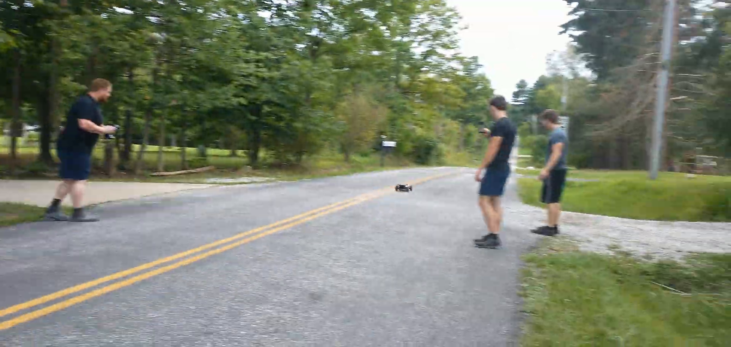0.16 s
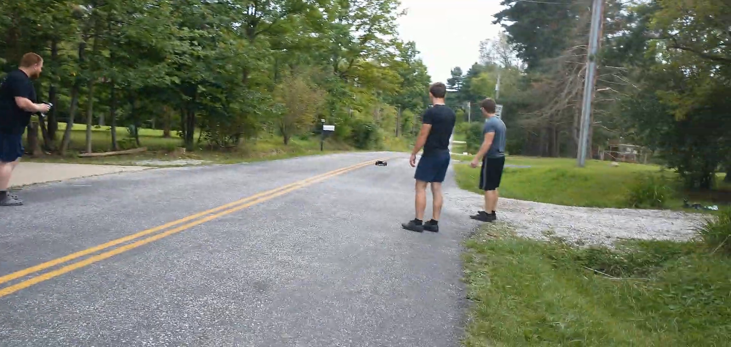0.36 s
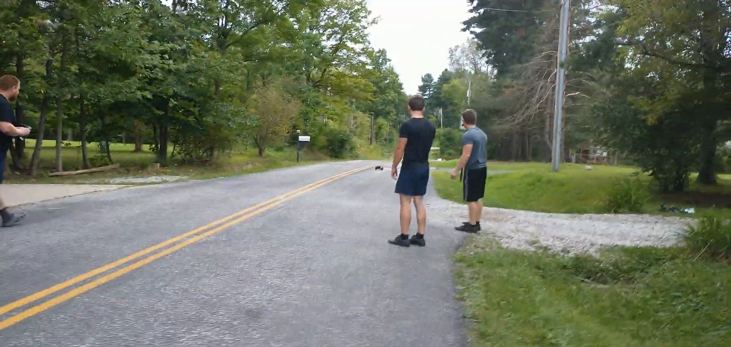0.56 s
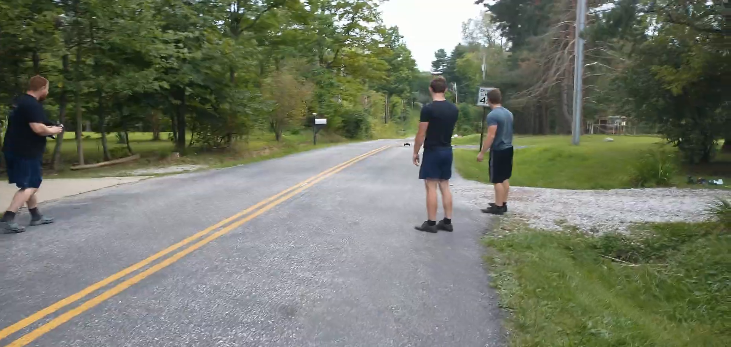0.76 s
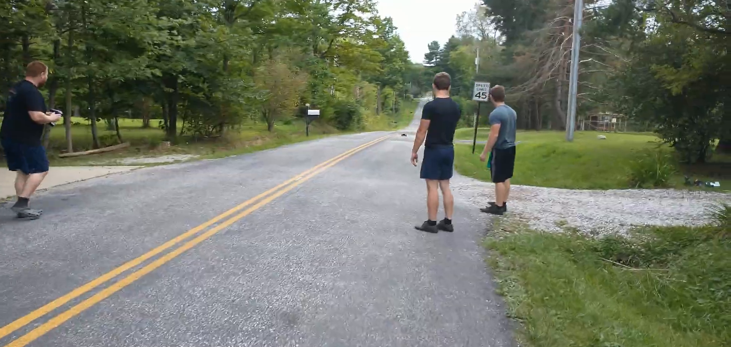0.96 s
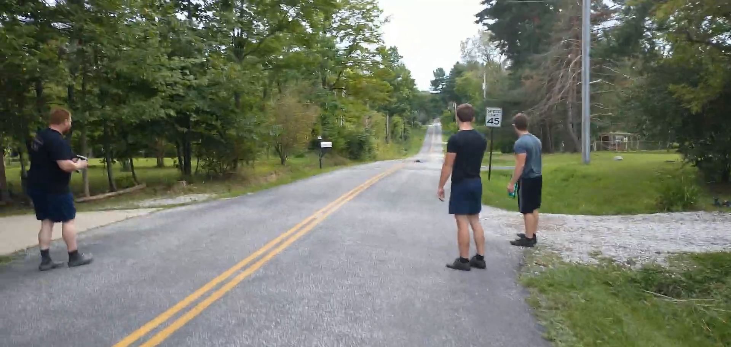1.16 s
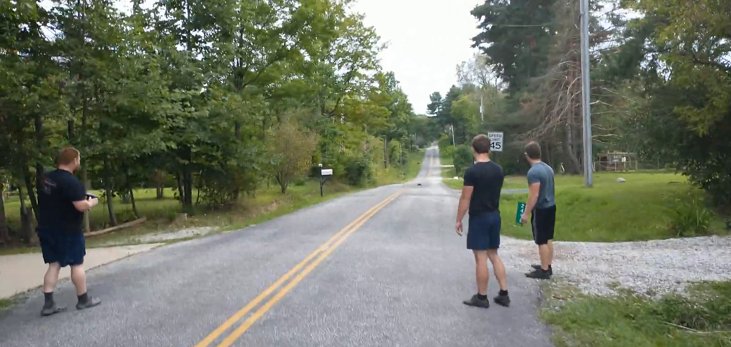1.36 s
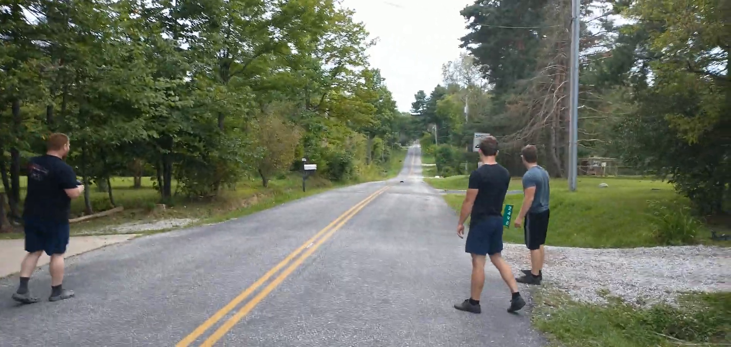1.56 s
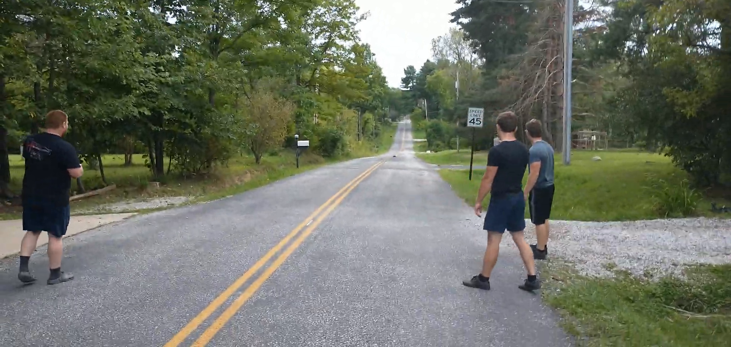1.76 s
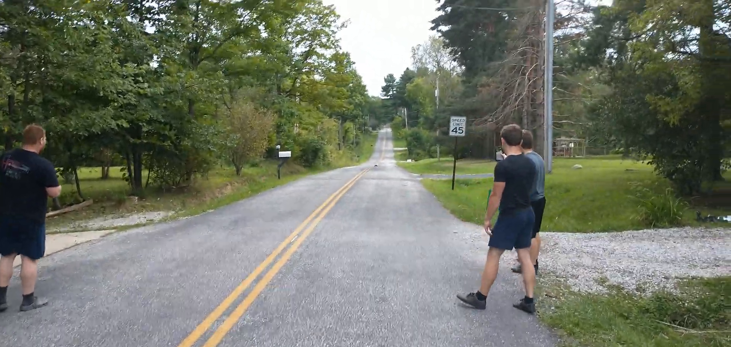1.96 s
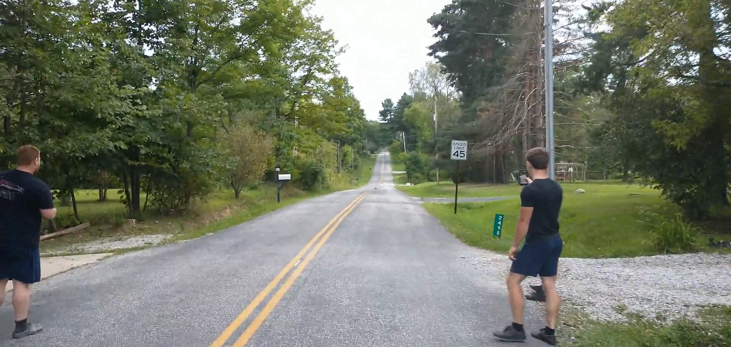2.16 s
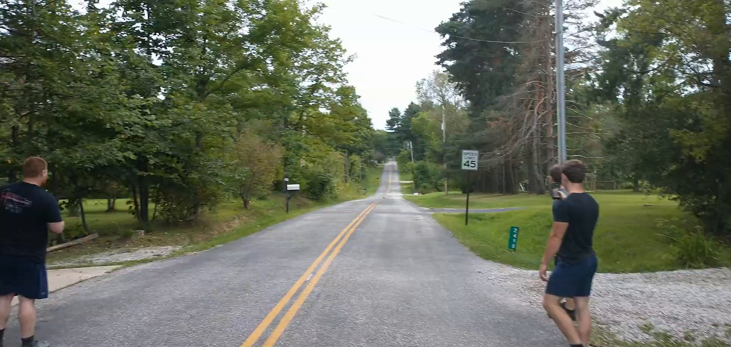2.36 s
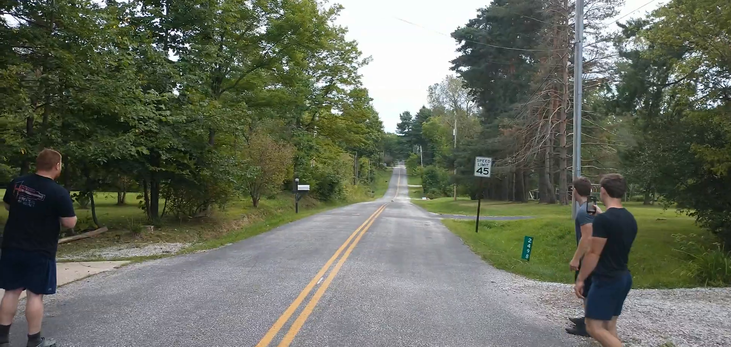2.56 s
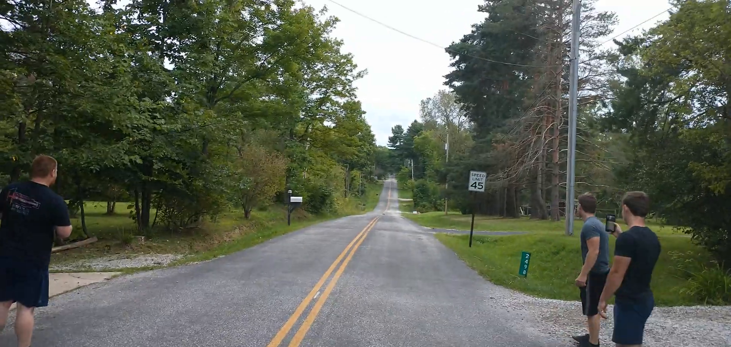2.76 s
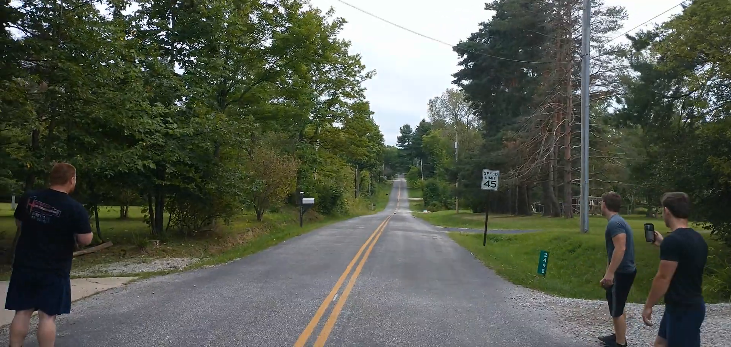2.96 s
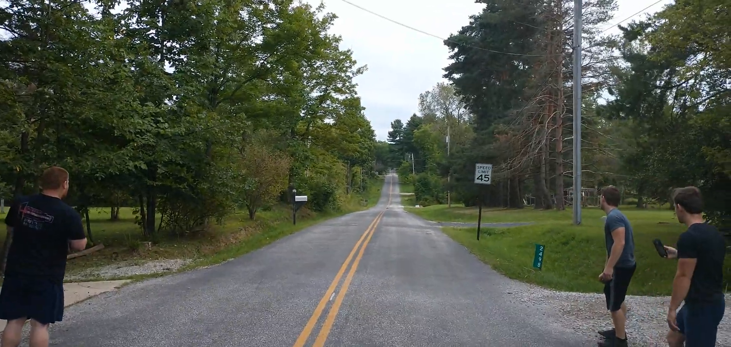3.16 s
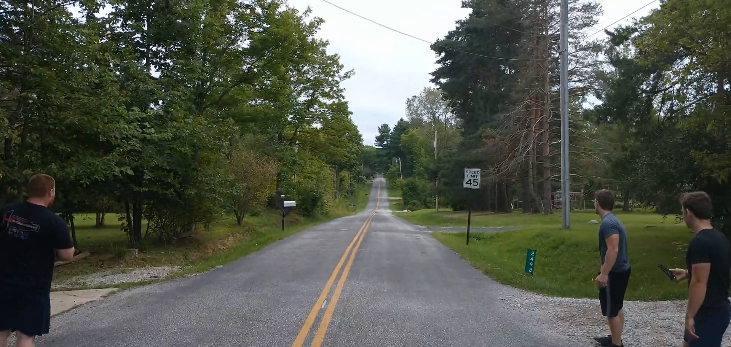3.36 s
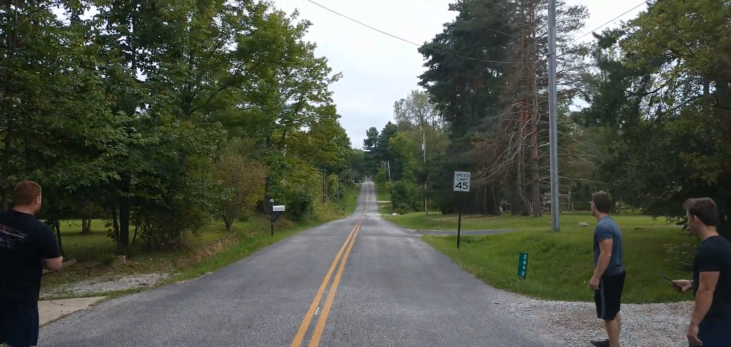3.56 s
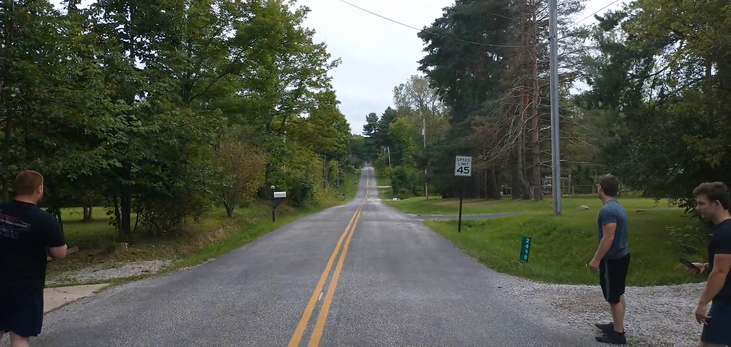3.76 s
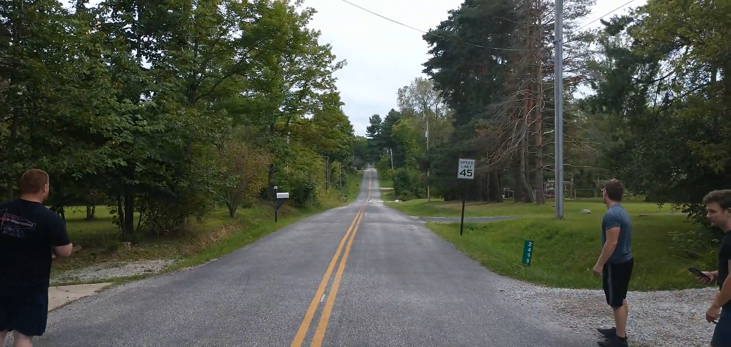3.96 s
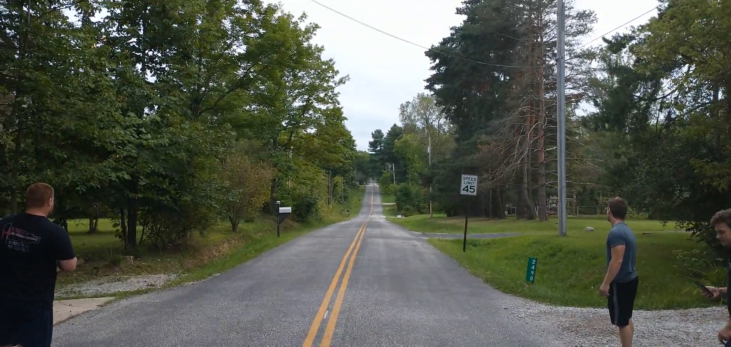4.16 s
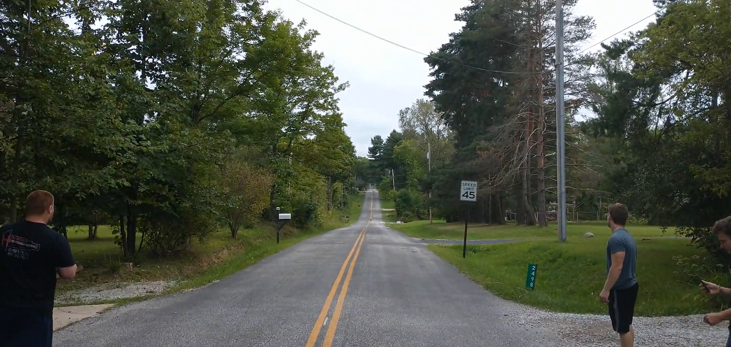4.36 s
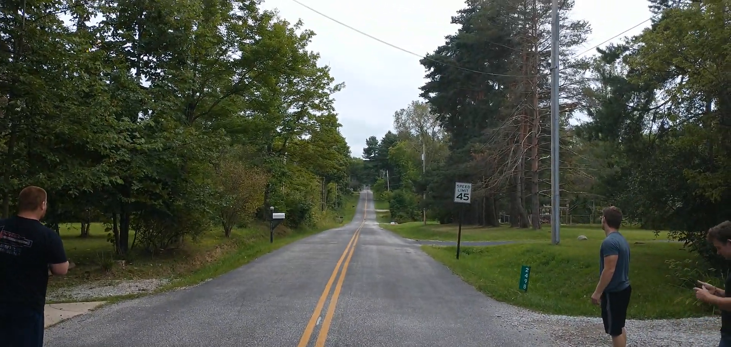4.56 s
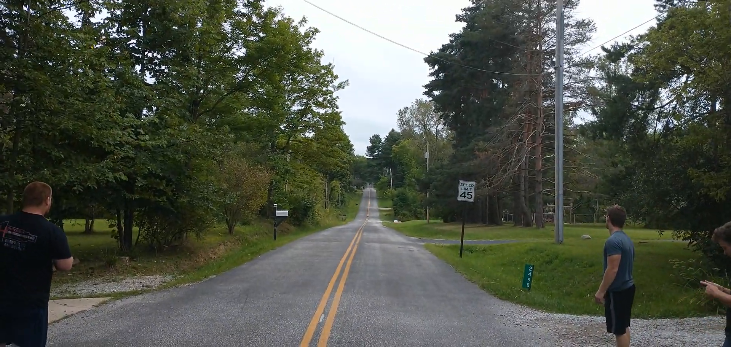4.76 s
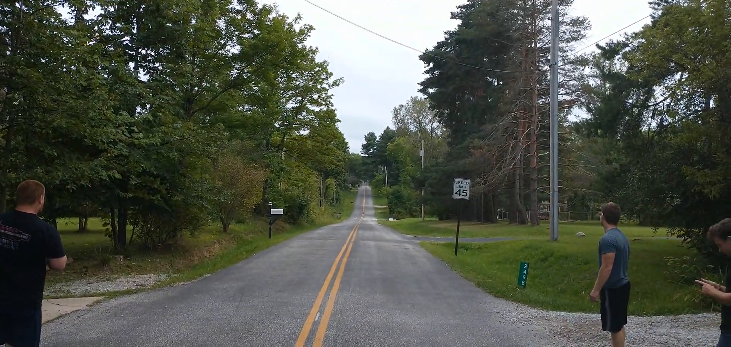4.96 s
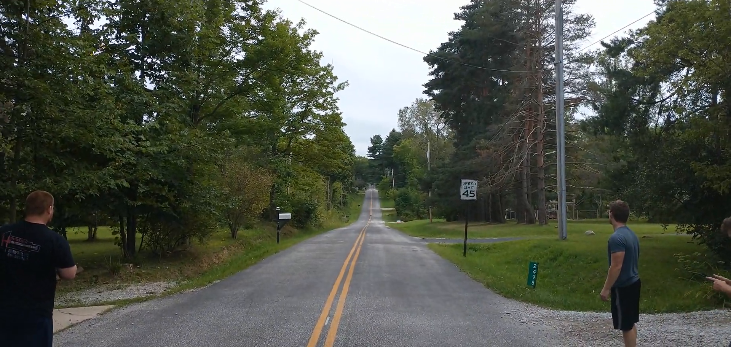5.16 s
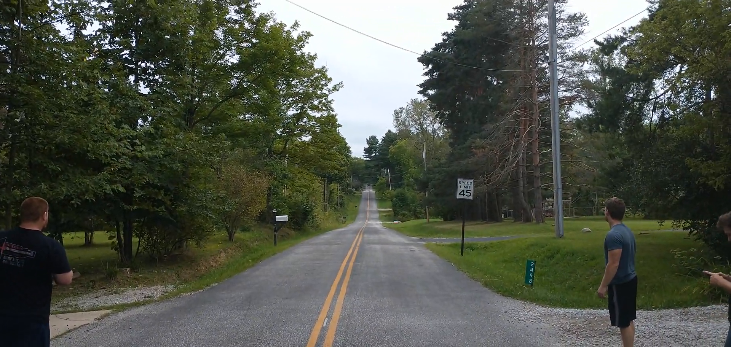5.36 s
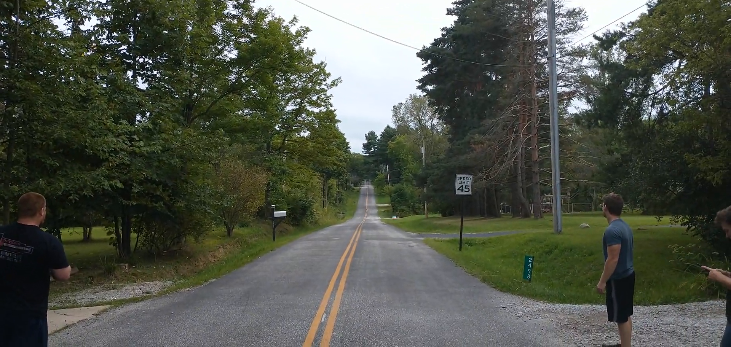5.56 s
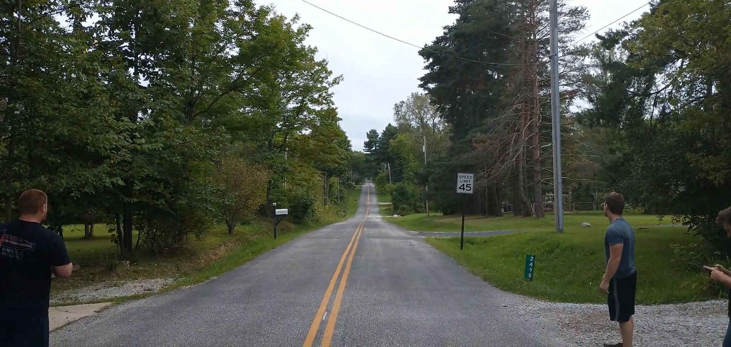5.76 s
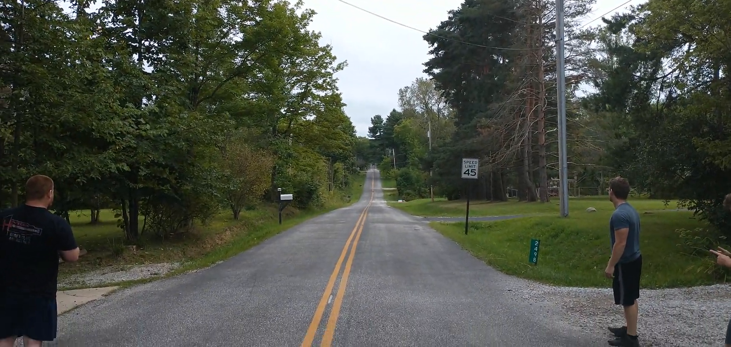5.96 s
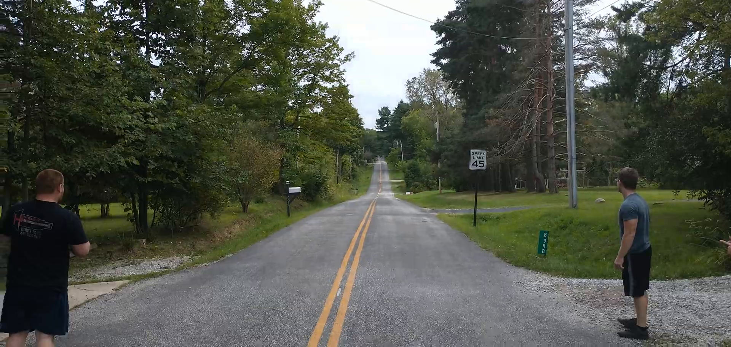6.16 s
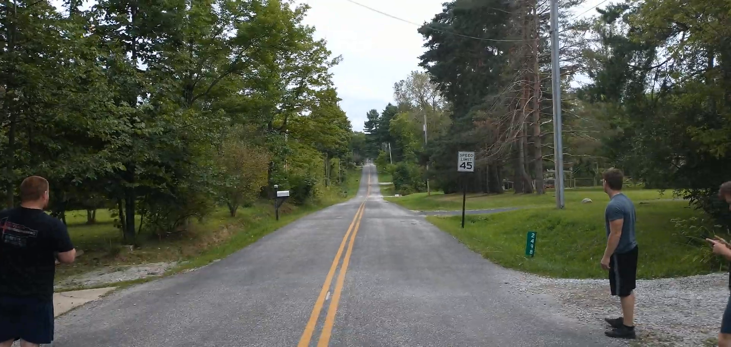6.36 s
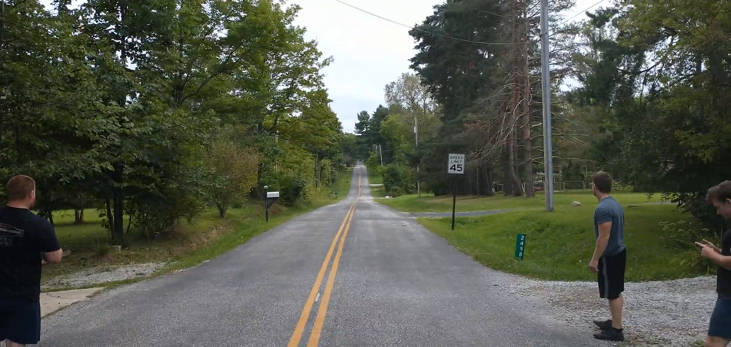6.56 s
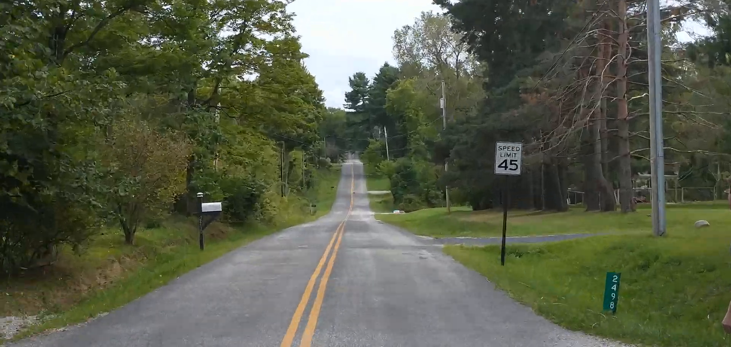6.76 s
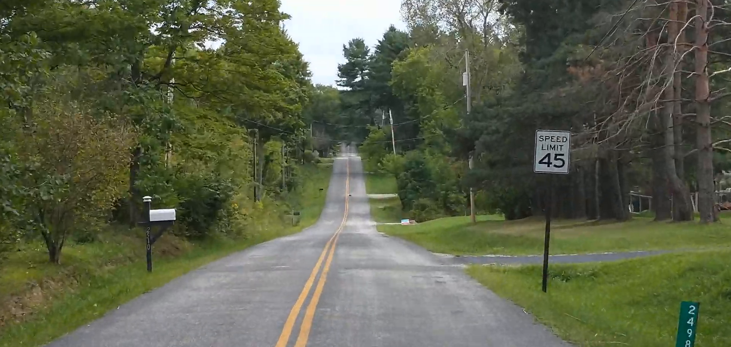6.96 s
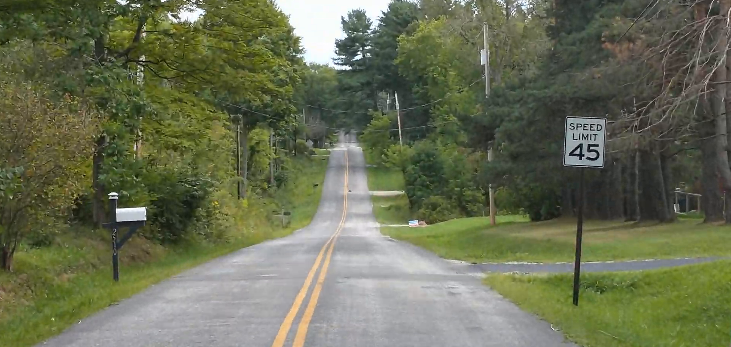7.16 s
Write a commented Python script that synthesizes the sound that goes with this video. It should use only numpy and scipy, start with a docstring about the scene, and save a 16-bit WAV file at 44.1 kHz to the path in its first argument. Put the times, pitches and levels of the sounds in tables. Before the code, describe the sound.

An electric remote-control buggy speeds away from close by, its high gear whine mixed with tyre roar and a hissing rasp. Shoes scuff gravel and the microphone takes a few dull bumps as the sound recedes. About halfway the throttle shuts, and the distant whine falls in pitch, swelling slightly under braking before it fades. Faint insects and a light breeze surround the country road.

```python
"""On a country road, an electric model buggy tears away at full throttle, then coasts and brakes.
Its meshing gear teeth whine, modulated once per wheel turn by an off-centre ring gear, over tyre
roar and drive-train rasp; spherical spreading weakens it all with distance. Insects sing in the
trees, a breeze rumbles, shoes scuff the gravel and the two-port microphone takes a few bumps."""
import sys
import numpy as np
from scipy import signal
from scipy.fft import rfft, irfft
from scipy.io import wavfile
from scipy.ndimage import uniform_filter1d

SR = 44100
rng = np.random.default_rng(int(sys.argv[2]) if len(sys.argv) > 2 else 0)


def master_out(mix):
    """Clip the mix to full scale and print it as 16-bit PCM to the path in sys.argv[1]."""
    frames = np.transpose(np.atleast_2d(mix))
    ceiling = np.clip(frames, -1, 1)
    pcm = np.round(ceiling * 32767).astype(np.int16)
    wavfile.write(sys.argv[1], SR, pcm)


N = 318402
T = np.arange(N) / SR
SHUT_S = 3.91  # the throttle shuts

# Phase by which the left microphone port leads the right: frequency_hz, lead_rad
PORT_LEAD = [(0, 0), (700, 0.54), (1100, 0.65), (1500, 4), (3000, 5), (16000, 29)]
# Level difference between the ports at a lean of 1: frequency_hz, left_minus_right_db
PORT_BALANCE = [(100, 0.5), (2200, -2), (3000, 3.5), (4400, 3.5), (5800, 10.5), (8500, 14.5), (12000, 2.5)]
# Peaks and notches in the running noise; those at 13.3 and 15.1 kHz are the thin whistle of the
# motor controller's switching under throttle: centre_hz, width_hz, boost_db
RUNNING_PEAKS = [(680, 120, 4), (870, 120, -3), (2030, 200, 2), (2260, 200, -6), (3900, 300, 2),
                 (13300, 260, 12), (15100, 260, 15)]
# Normal modes of the gear case: centre_hz, half_width_hz, level_db
GEAR_CASE_MODES = [(1638, 130, -3.5), (1876, 73, -6.5), (2670, 38, -13), (3337, 120, 1.5),
                   (3950, 380, -6.5), (4930, 180, -12.5)]


def amp(db):
    """Decibels to amplitude ratio."""
    return 10 ** (np.asarray(db) / 20)


def unit_rms(x):
    """Normalisation to unit mean power."""
    return x / np.sqrt(np.mean(x ** 2) + 1e-20)


def spectrum_at(points, hz):
    """Interpolation of a spectrum on a log-frequency axis."""
    f, value = np.transpose(points)
    return np.interp(np.log(hz + 1), np.log(f + 1), value)


def ramp(start_s, length_s):
    """A linear rise from 0 to 1, then held."""
    return np.clip((T - start_s) / length_s, 0, 1)


def swell(centre_s, half_s):
    """A Gaussian envelope of height 1."""
    return np.exp(-((T - centre_s) / half_s) ** 2)


def add(mix, start_s, sound):
    """Superposition of a stereo sound on the mix."""
    part = mix[:, round(start_s * SR):][:, :sound.shape[1]]
    part += sound[:, :part.shape[1]]


def drift(rate_hz):
    """Slow random fluctuation: low-passed noise of rms 1."""
    hz = np.fft.rfftfreq(N, 1 / SR)
    return unit_rms(irfft(rfft(rng.standard_normal(N)) / (1 + (hz / rate_hz) ** 4), N))


def port_lag(hz):
    """Phase lag of the right port, as a unit phasor."""
    return np.exp(-1j * np.interp(hz, *np.transpose(PORT_LEAD)))


def noise(spectrum, patchy_db, peaks=(), lean=0.77):
    """Partially coherent noise at the two ports, patchy in time and frequency; their mean has rms 1."""
    # Likeness of the two ports' signals: frequency_hz, coherence
    port_coherence = [(40, .5), (140, .95), (750, .93), (1400, .6), (2400, .45), (3900, .65), (6000, .25)]
    frames, hz = N // 256 + 5, np.fft.rfftfreq(1024, 1 / SR)
    a, b, c, d, patches = rng.standard_normal((5, frames, len(hz)))
    patches = unit_rms(uniform_filter1d(uniform_filter1d(patches, size=10, axis=0), size=8, axis=1))
    coherence = np.clip(spectrum_at(port_coherence, hz), 0, 1)
    left, independent = a + 1j * b, c + 1j * d
    right = (coherence * left + np.sqrt(1 - coherence ** 2) * independent) * port_lag(hz)
    side = amp(lean * spectrum_at(PORT_BALANCE, hz) / 2)
    boost_db = sum(db / (1 + (2 * (hz - f) / width) ** 2) for f, width, db in peaks)
    gain = amp(spectrum_at(spectrum, hz) + boost_db + patchy_db * patches)
    spectra = np.array([left * side, right / side]) * gain
    x = signal.istft(spectra.transpose(0, 2, 1), nperseg=1024, noverlap=768)[1][:, :N]
    return x / np.std(x.mean(0))


def tone(cycles, hz, fading, blur, lean=0.74):
    """Multipath interference: shifting reflections off the road fade and blur a tone at both ports."""
    common = 1 + fading * (drift(7.1) + 1j * drift(14))
    paths = np.array([common + blur * (drift(31) + 1j * drift(28)) for port in range(2)])
    side = amp(lean * spectrum_at(PORT_BALANCE, hz) / 2)
    ports = np.array([side, port_lag(hz) / side])
    return unit_rms((paths * np.exp(2j * np.pi * cycles) * ports).real)


def countryside():
    """Incoherent sources sum to steady noise: low rumble, leaves and an insect chorus near 6.7 kHz."""
    # Ambient spectrum: frequency_hz, relative_db
    ambient_spectrum = [(25, -48), (60, -2), (105, 2), (200, -10), (420, -19), (700, -9.5), (2000, -27),
                        (3600, -21.5), (5000, -22), (6100, -7.5), (6800, -6), (7700, -17.5), (9000, -33)]
    return amp(-66) * noise(ambient_spectrum, patchy_db=1.6, lean=0.18)


def breeze():
    """Turbulent pressure on the microphone makes a low rumble."""
    # Strength of the breeze: time_s, level_db
    gust_levels = [(1, -64.5), (2, -61.5), (5, -75), (6.2, -74.5), (7, -82.5)]
    # Turbulence spectrum: frequency_hz, relative_db
    gust_spectrum = [(25, -39.5), (65, 1.5), (150, 1), (260, -26.5), (900, -61)]
    return amp(np.interp(T, *np.transpose(gust_levels))) * noise(gust_spectrum, patchy_db=1.0)


def knocks():
    """Impacts decay exponentially: dull bumps on the microphone and bright ticks of gravel."""
    # Bumps, each a damped sine with a scuff: start_s, nominal_db, pitch_hz, scuff_t60_s
    bumps = [(0.849, -32, 298, 0.17), (.858, -33, 270, 0.06), (0.97, -33, 560, 0.056),
             (1.079, -32, 130, 0.06), (1.139, -37.5, 288, 0.084), (1.644, -30.5, 297, 0.049),
             (1.71, -43, 75, 0.082), (2.831, -39, 235, 0.089), (3.893, -34, 303, 0.069),
             (3.908, -39, 1110, 0.045), (6.361, -38.5, 650, 0.018)]
    # Bursts of grit: start_s, level_db, t60_s
    ticks = [(.849, -22, 0.031), (0.856, -24, 0.068), (0.97, -22.5, 0.024), (1.023, -25.5, 0.016),
             (1.119, -21.5, 0.032), (2.337, -47, .02), (6.3619, -30.5, 0.0032)]
    out, t = np.zeros((2, N)), np.arange(SR // 6) / SR
    for start_s, db, hz, t60 in bumps:
        band = signal.butter(2, [hz * 0.48, hz * 2.6], "band", fs=SR, output="sos")
        scuff = .6 * unit_rms(signal.sosfilt(band, rng.standard_normal(len(t)))) * amp(-60 * t / t60)
        push = .42 * np.sin(2 * np.pi * hz * t) * amp(-60 * t / (.5 * t60))
        add(out, start_s, amp(db) * (push + scuff) * np.ones((2, 1)))
    grit_band = signal.butter(1, [700, 10000], "band", fs=SR, output="sos")
    for start_s, db, t60 in ticks:
        grit = unit_rms(signal.sosfilt(grit_band, rng.standard_normal((2, len(t)))))
        add(out, start_s, amp(db - 60 * t / t60) * grit)
    return out


def tree_echoes(x, t60_s):
    """Scattering from the roadside trees gives a diffuse, decaying tail."""
    t = np.arange(SR // 2) / SR
    tail = rng.standard_normal((2, len(t))) * amp(-60 * t / t60_s) * (t > .02)
    return signal.fftconvolve(x, tail / np.linalg.norm(tail[0]), axes=1)[:, :N]


def throttle(decay_s=0.09):
    """Drive power: 1 until the throttle shuts, then an exponential decay."""
    return np.exp(-np.maximum(T - SHUT_S, 0) / decay_s)


def motion(start_m=6.81, turn_m=0.34, db_per_speed_decade=23.5):
    """The buggy's run: its level falls by spherical spreading and as the wheels slow."""
    # Wheel rate as heard, flat out, coasting, then braking: time_s, turns_per_s
    wheel_rates = [(0, 66.24), (.5, 66.77), (2.3, 67.6), (3.9, 67.23), (4.35, 61.78), (5.3, 52.48),
                   (5.75, 44), (6.05, 39.4), (6.4, 35.42), (7.22, 28.14)]
    wheel_hz = np.interp(T, *np.transpose(wheel_rates))
    turns = np.cumsum(wheel_hz) / SR
    metres = turn_m * turns
    speed_db = db_per_speed_decade * np.log10(wheel_hz / wheel_hz[0])
    receding_db = speed_db - 20 * np.log10(1 + metres / start_m)
    return wheel_hz, turns, metres, receding_db


def carried(run, db, loss_db_per_100m, tail_db=0, blocked_db=0, crest_db=0, shade_s=1, delay_s=0):
    """Propagation gain of one part: spreading, ground loss, directivity and acoustic shadows."""
    *_, metres, receding_db = run
    ground_db = loss_db_per_100m * metres / 100
    beam_db = tail_db * ramp(0.73, 1)  # the open tail swings round to face the listener
    bystanders_db = blocked_db * swell(0.865, 0.22)  # the buggy passes behind two people
    sunk = 1 - np.exp(-np.maximum(T - 2.125 - delay_s, 0) / shade_s)  # then behind a low crest
    return amp(db + receding_db - ground_db + beam_db - bystanders_db - crest_db * sunk)


def overrun(run, db, settle_db_per_s, rise_s=0.34, settle_s=6.35):
    """Gain of backlash chatter while the wheels drive the motor: it swells, then settles at low speed."""
    *_, receding_db = run
    settled_db = settle_db_per_s * np.maximum(T - settle_s, 0)
    return ramp(SHUT_S, rise_s) * amp(db + receding_db - settled_db)


def tyres(run):
    """Rolling contact radiates a broadband roar and a hollow drone, both weaker without power."""
    # Tyre roar: frequency_hz, relative_db
    roar_spectrum = [(50, -60), (130, -17), (350, -3), (490, -6), (640, -2.5), (1150, 7), (1480, -1),
                     (1750, 0.5), (2600, 4.5), (3400, -49)]
    # Tyre drone: frequency_hz, relative_db
    drone_spectrum = [(400, -25), (590, 9), (720, 7), (830, -18), (1150, 8.5), (1350, 13), (1600, 13),
                      (2000, 7.5), (2550, 7.5), (2900, -51)]
    roar = carried(run, db=-25.5, loss_db_per_100m=8, tail_db=-0.5)
    drone = carried(run, db=-39, loss_db_per_100m=5.5, tail_db=8.5, crest_db=-4, shade_s=0.068)
    coasting_db = -9 * (1 - throttle())
    return amp(coasting_db) * (roar * noise(roar_spectrum, patchy_db=2, peaks=RUNNING_PEAKS)
                               + drone * noise(drone_spectrum, patchy_db=2, peaks=RUNNING_PEAKS))


def drive_train(run):
    """Rasp and hiss are amplitude-modulated at the wheel rate; the fizz carries the switching whistle."""
    # Rasp, hiss and fizz, from low to high: frequency_hz, relative_db
    rasp_spectrum = [(2000, -30.5), (2700, 4), (3400, 0.5), (4050, 0), (4900, -36)]
    hiss_spectrum = [(3500, -25.5), (4300, 3), (5700, 5.5), (6500, -3.5), (9000, -7), (10500, -34.5)]
    fizz_spectrum = [(7500, -24), (9500, 2.5), (15600, -1.5)]
    _, turns, *_ = run
    power = throttle()
    throb = 1 + 0.1 * np.sin(2 * np.pi * turns)
    rasp = power * carried(run, db=-27, loss_db_per_100m=15, tail_db=12.5,
                           blocked_db=2.5, crest_db=12, shade_s=0.68)
    rasp += overrun(run, db=-39, settle_db_per_s=28)
    hiss = power * carried(run, db=-24, loss_db_per_100m=18, tail_db=7.5,
                           blocked_db=2, crest_db=17.5, shade_s=0.14, delay_s=0.083)
    fizz = power * carried(run, db=-35.5, loss_db_per_100m=14.5, crest_db=36, shade_s=0.42)
    return (throb * rasp * noise(rasp_spectrum, patchy_db=0.13, peaks=RUNNING_PEAKS)
            + throb * hiss * noise(hiss_spectrum, patchy_db=1.84, peaks=RUNNING_PEAKS)
            + fizz * noise(fizz_spectrum, patchy_db=0, peaks=RUNNING_PEAKS))


def motor(run, gear_ratio=10.36, fade_db_per_s=58):
    """Rotation makes tones: the rotor's hum, heard only close by, and shaft orders under throttle."""
    # Shaft tones: cycles_per_wheel_turn, relative_db
    shaft_orders = [(30, -12), (50, -15.5), (51, -10)]
    wheel_hz, turns, *_ = run
    hum = tone(gear_ratio * turns, gear_ratio * wheel_hz, fading=0.34, blur=0.34)
    shafts = sum(amp(db) * tone(k * turns, k * wheel_hz, fading=.25, blur=.15) for k, db in shaft_orders)
    shaft_gain = carried(run, db=-29, loss_db_per_100m=17.5, tail_db=15.5, blocked_db=17, crest_db=21)
    return amp(-29.5 - fade_db_per_s * T) * hum + throttle() * shaft_gain * shafts


def case_swell():
    """Resonance: a narrow gear-case ring near 1.6 kHz swells briefly around 1.2 s."""
    # Band of the ringing mode: frequency_hz, relative_db
    ring_spectrum = [(1380, -35), (1560, -0.5), (1700, -2.5), (1900, -26.5)]
    return amp(-42) * swell(centre_s=1.16, half_s=0.57) * noise(ring_spectrum, patchy_db=0.5)


def gear_case(run):
    """Modal excitation: tooth errors and loose play, both recurring every wheel turn, ring the case."""
    _, turns, *_ = run
    errors = rng.standard_normal(256)
    pattern = np.interp(turns, np.arange(len(errors)) / len(errors), errors, period=1)
    rattle = rng.standard_normal((2, N)) * (1 + 0.84 * np.sin(2 * np.pi * turns + drift(9)))
    slack = np.interp(T, [3.9, 4.4], [.3, .7])
    force = (1 - slack) * pattern + slack * rattle
    hz = np.fft.rfftfreq(N, 1 / SR)
    response = sum(amp(db) / (1 + 1j * (hz - f) / width) ** 2 for f, width, db in GEAR_CASE_MODES)
    ports = np.array([np.ones(len(hz)), port_lag(hz)])
    ringing = unit_rms(irfft(rfft(force) * response * ports, N))
    driven = carried(run, db=-35.5, loss_db_per_100m=12.5, tail_db=14.5, crest_db=17.5, shade_s=0.8)
    return (throttle() * driven + overrun(run, db=-32, settle_db_per_s=15)) * ringing


def case_gain(hz, leak=0.27):
    """Resonance: a gliding tone swells as it crosses each mode of the gear case."""
    return leak + sum(amp(db) / (1 + ((hz - f) / width) ** 2) for f, width, db in GEAR_CASE_MODES)


def gear_whine(run, teeth=43, brake_db=9.5):
    """Modulation by the off-centre ring gear gives the mesh tone sidebands one wheel rate apart."""
    # Surges and dips of the driven whine: centre_s, half_length_s, fundamental_db, second_harmonic_db
    surges = [(0.152, 0.045, 5.5, 8), (0.29, .05, -1, -3), (0.462, 0.087, 5.5, 3), (1.058, 0.064, 6.5, 0),
              (2.05, 0.27, 2.5, 6.5)]
    wheel_hz, turns, *_ = run
    power, braking = throttle(), ramp(start_s=5.47, length_s=0.096)
    swing_rad = np.interp(T, [.5, 1.1, 3.9, 4.4], [.4, 1.25, 1.25, .6])
    mesh_cycles = teeth * turns + swing_rad * np.sin(2 * np.pi * turns) / (2 * np.pi)
    # unloaded teeth chatter: deeper throb, rougher tone
    depth = np.interp(T, [3.9, 5.5], [.2, .55])
    blur = .22 - .12 * power
    throb = 1 + depth * np.sin(2 * np.pi * turns + .9 * drift(12))
    lean = np.interp(T, [.4, 1.8, 3], [.2, 1.4, .6])  # how far the whine sits to the left
    surge = amp(sum(np.outer(db, swell(s, half_s)) for s, half_s, *db in surges))
    # gains of three harmonics, under power and on the overrun; the third needs the brake
    driven = [surge[0] * carried(run, db=-24.5, loss_db_per_100m=15, tail_db=9,
                                 blocked_db=7, crest_db=9.5),
              surge[1] * carried(run, db=-25, loss_db_per_100m=18.5, tail_db=6,
                                 blocked_db=7, crest_db=19.5, shade_s=0.092, delay_s=0.21),
              0]
    coasting = [overrun(run, db=-35.5, settle_db_per_s=12.5),
                overrun(run, db=-38, settle_db_per_s=12),
                braking * overrun(run, db=-42, settle_db_per_s=13)]
    whine = np.zeros((2, N))
    for k, (loaded, free) in enumerate(zip(driven, coasting), 1):
        hz = k * teeth * wheel_hz
        gain = power * loaded + amp(brake_db * braking) * free * case_gain(hz)
        whine += gain * tone(k * mesh_cycles, hz, fading=.12, blur=blur * k, lean=lean)
    whine *= throb / np.sqrt(1 + depth ** 2 / 2)  # the throb keeps the mean power
    return whine + amp(-10) * tree_echoes(whine, t60_s=.5)


def scene():
    """Superposition of the buggy and its surroundings."""
    run = motion()
    buggy = gear_whine(run) + gear_case(run) + motor(run) + tyres(run) + drive_train(run) + case_swell()
    return buggy + breeze() + countryside() + knocks()


def record(dry, low_cut_hz=48, high_cut_hz=15800):
    """Band limiting at the microphone: a high-pass wind filter and a steep low-pass."""
    wind_filter = signal.butter(2, low_cut_hz, "high", fs=SR, output="sos")
    low_pass = signal.firwin(511, high_cut_hz, window=("kaiser", 9), fs=SR)
    return signal.oaconvolve(signal.sosfilt(wind_filter, dry), low_pass[None], "same", axes=1)


dry = scene()
out = record(dry)
master_out(out)
```